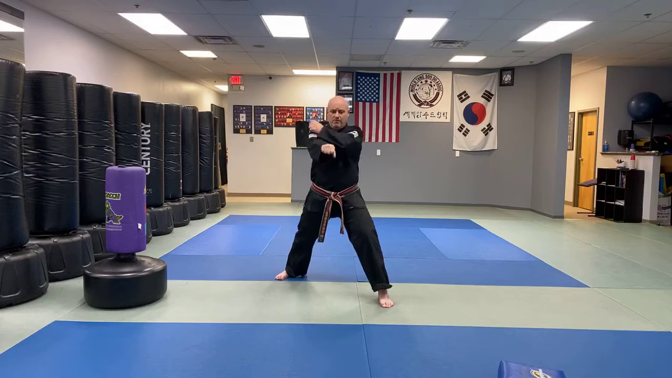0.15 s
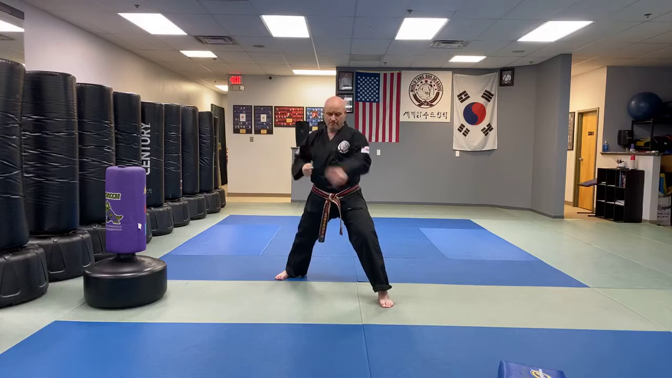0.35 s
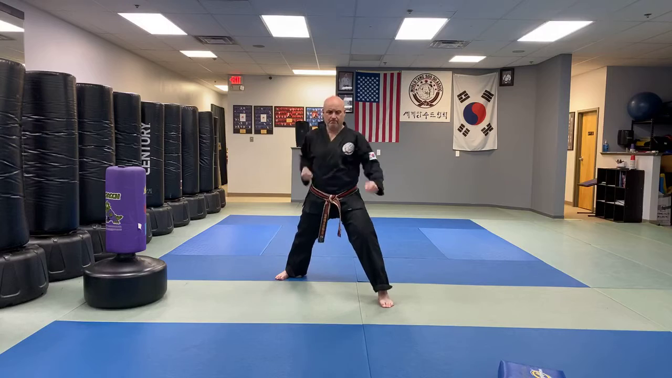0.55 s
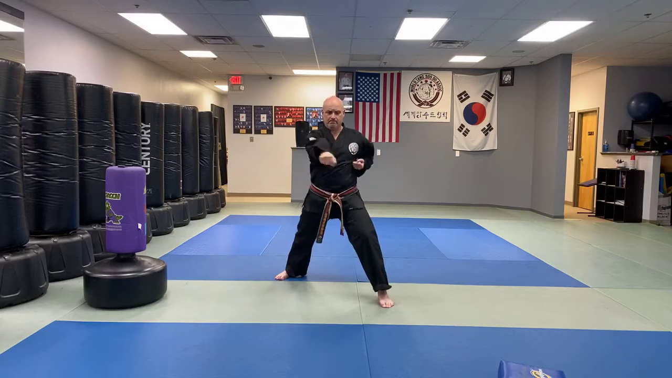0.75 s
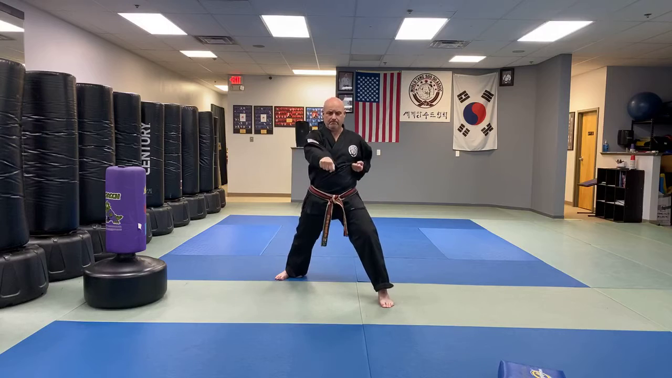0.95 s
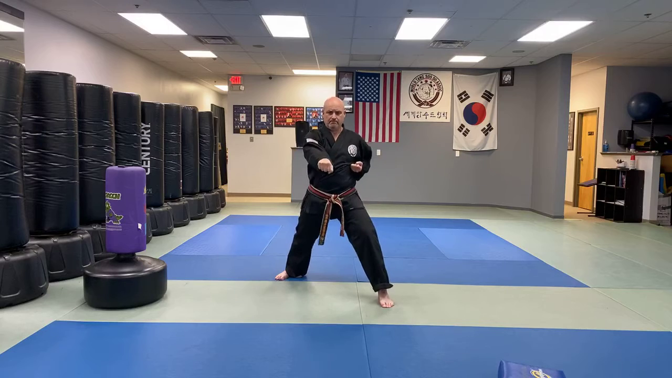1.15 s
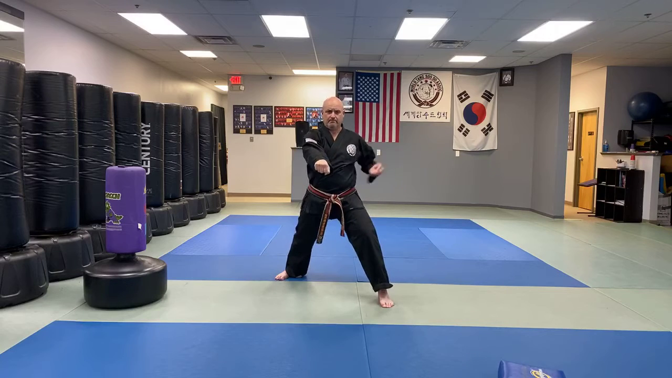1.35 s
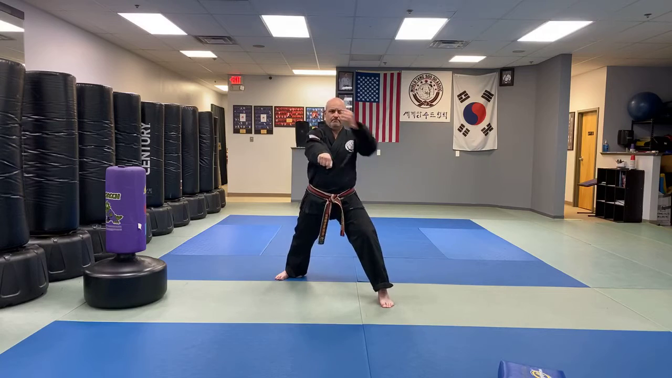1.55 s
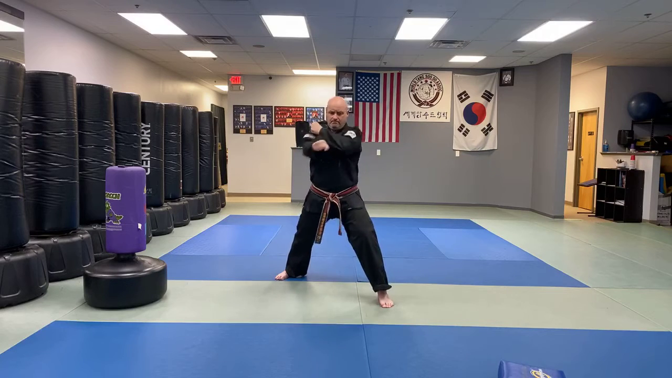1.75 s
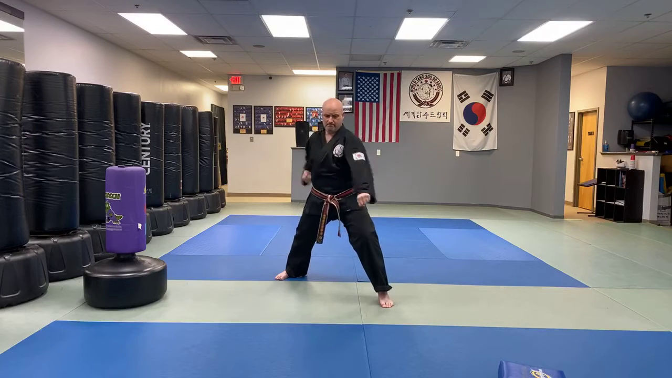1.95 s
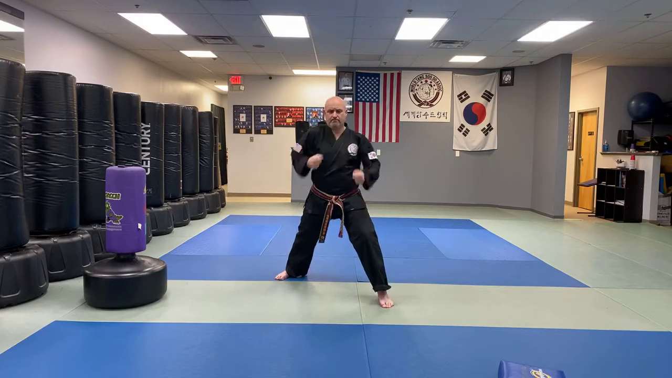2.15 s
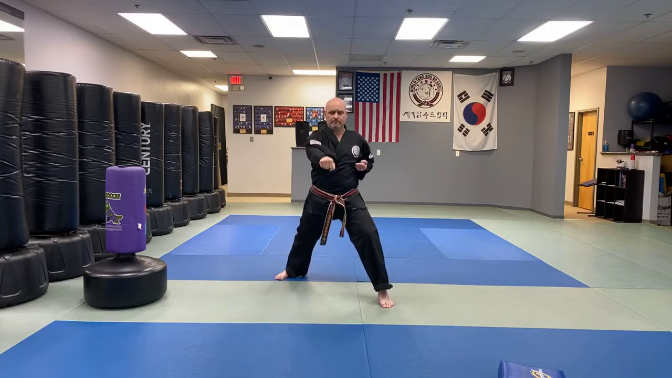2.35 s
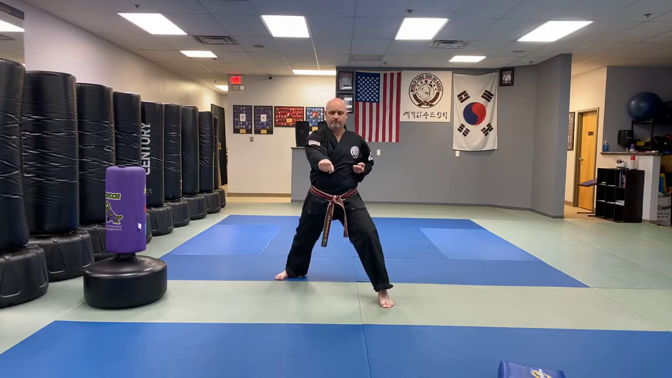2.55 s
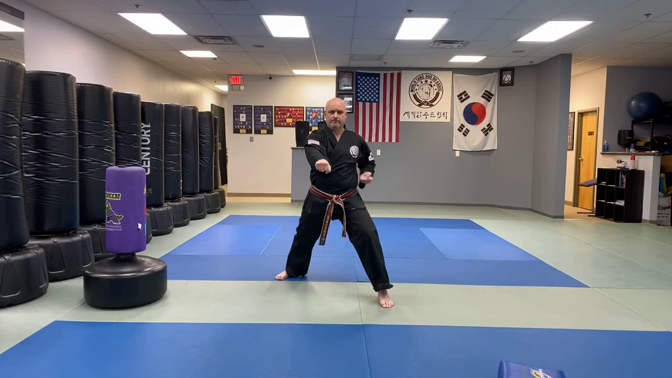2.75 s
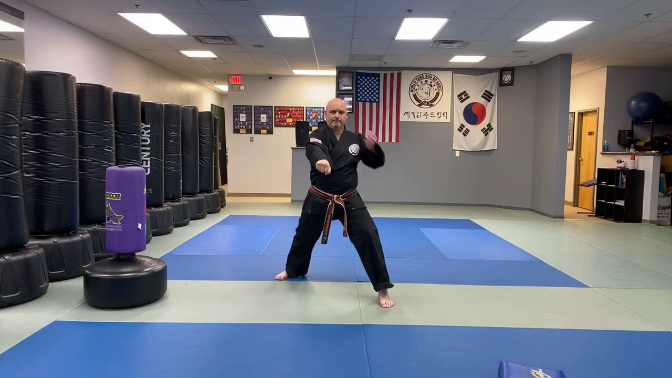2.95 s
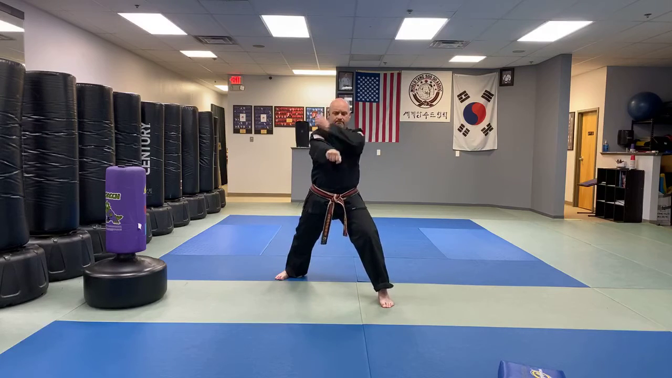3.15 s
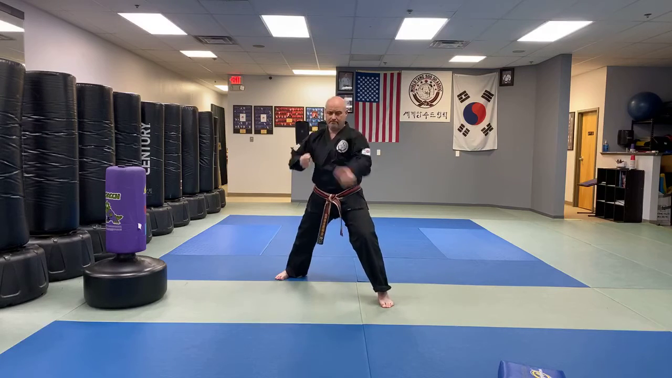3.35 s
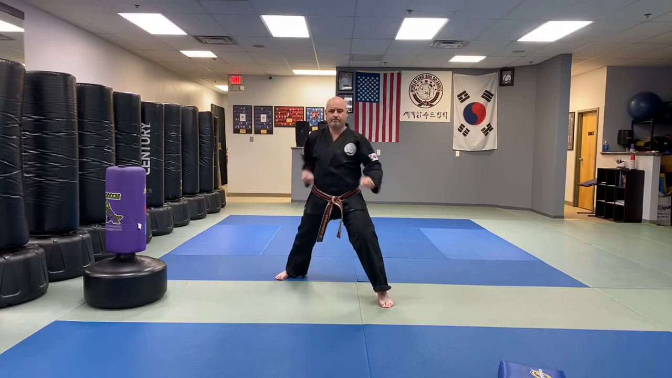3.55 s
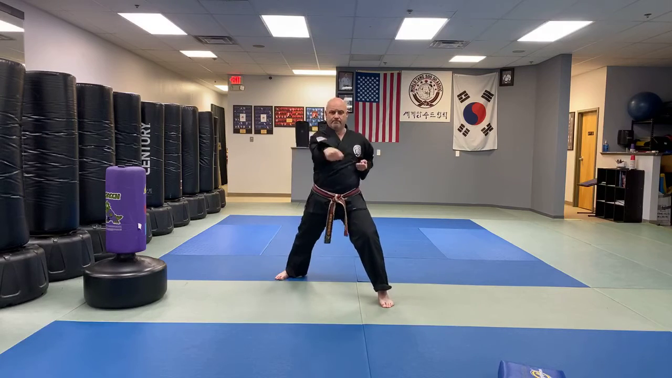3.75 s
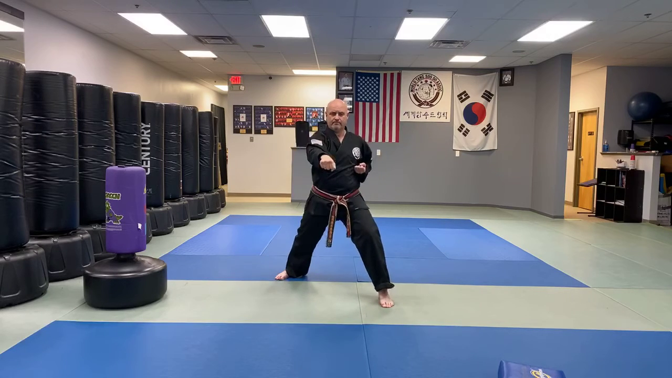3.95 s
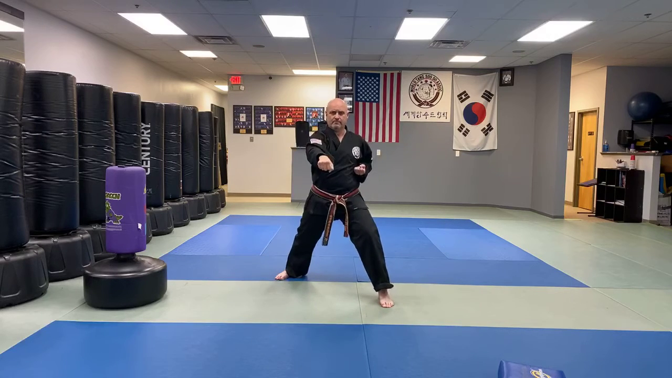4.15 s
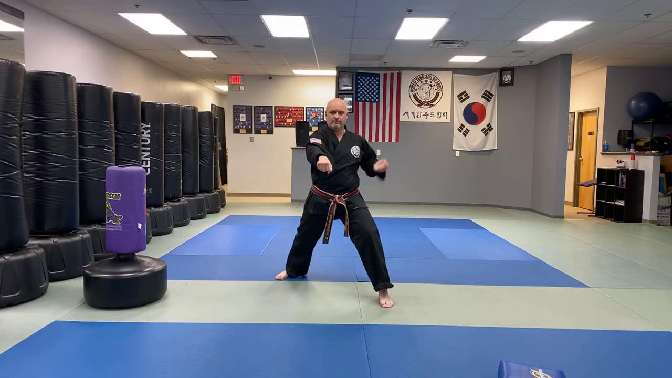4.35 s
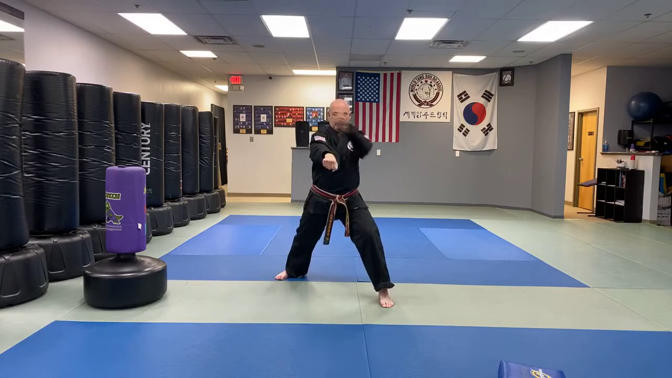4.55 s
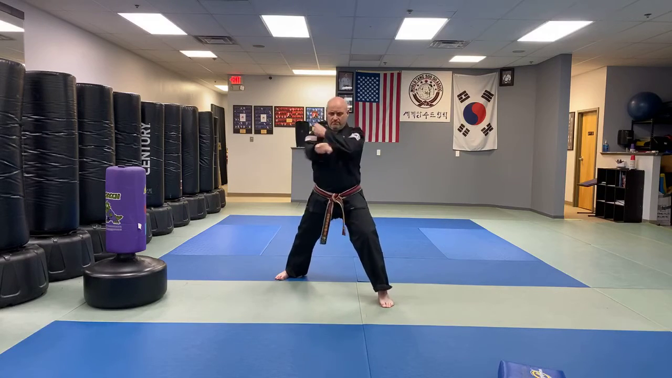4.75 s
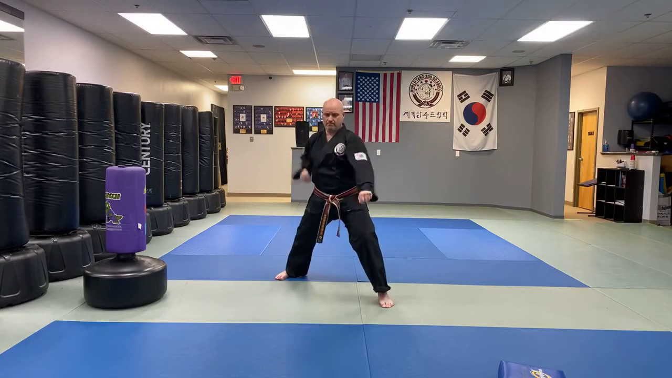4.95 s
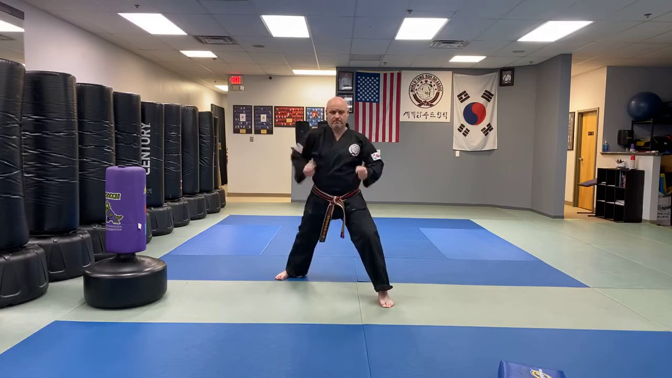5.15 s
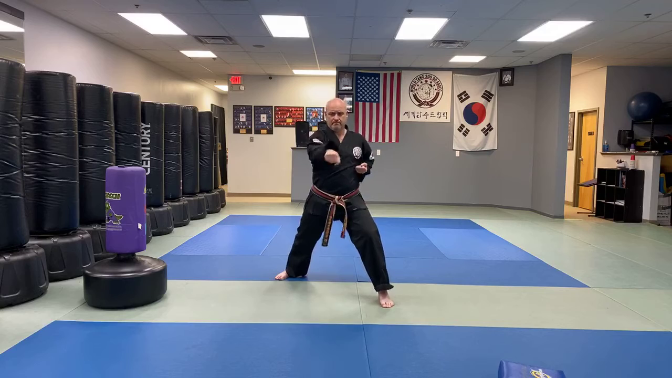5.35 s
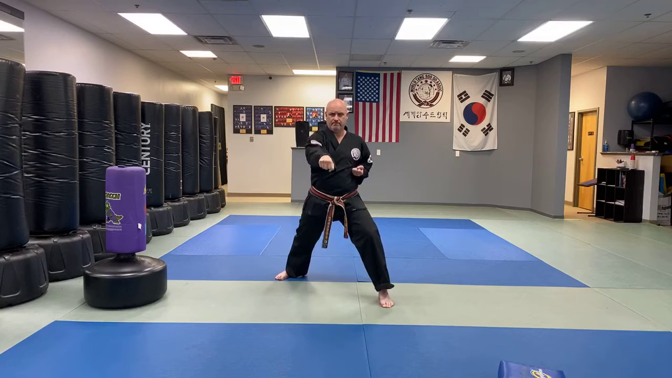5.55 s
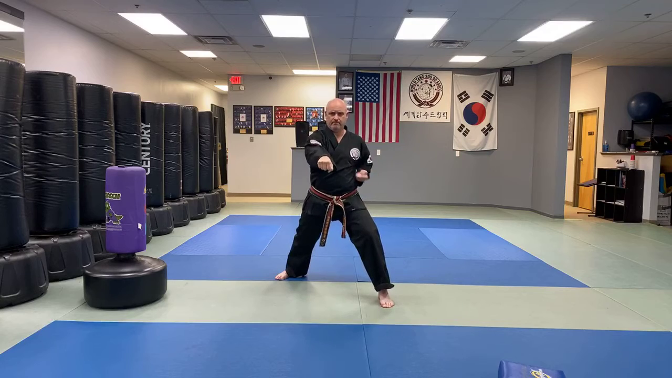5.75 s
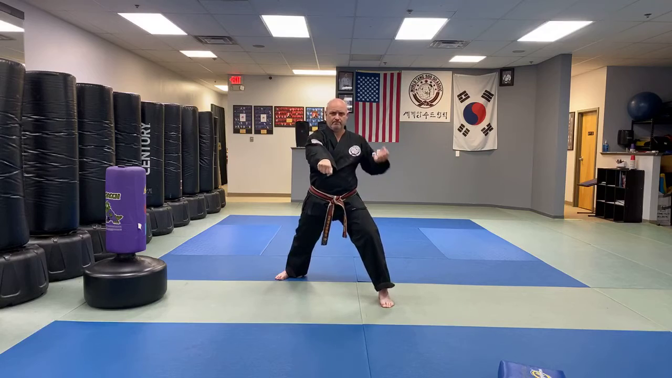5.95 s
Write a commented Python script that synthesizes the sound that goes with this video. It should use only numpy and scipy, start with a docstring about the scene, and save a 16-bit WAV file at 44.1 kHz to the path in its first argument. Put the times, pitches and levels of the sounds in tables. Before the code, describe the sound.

Heavy cotton sleeves swish and snap taut in four block-and-punch rounds, with low cloth thumps, quiet gaps and a fifth swing starting.

```python
"""Heavy cotton sleeves in a block-and-punch drill

In each of four rounds the arms wind up, then strike and settle; a fifth wind-up begins.
Fibre slips, as shaped noise, drag and swish while the loose jacket flops in the bass. Short damped swings of air
thump as cloth snaps taut and pop, followed by a fizz, as creases open. Two folds flutter as gliding tones,
and a faint steady noise hisses beneath."""
import sys
import numpy as np
from scipy import signal
from scipy.fft import rfft, irfft
from scipy.io import wavfile
from scipy.ndimage import uniform_filter1d

SR = 44100
rng = np.random.default_rng(int(sys.argv[2]) if len(sys.argv) > 2 else 0)


def int16_out(signal):
    """Quantize to a 16-bit WAV file."""
    q = np.round(np.clip(np.atleast_2d(signal).T, -1, 1) * 32767)
    wavfile.write(sys.argv[1], SR, q.astype(np.int16))


N = 268921
T = np.arange(N) / SR  # time [s]


def undb(db):
    """Decibel law: 20 dB is a factor of ten in amplitude."""
    return 10 ** (np.asarray(db) / 20)


def colour(x, points):
    """Minimum-phase filtering: a folded cepstrum makes the gain outline causal; white noise keeps its rms."""
    hz, db = np.transpose(points)
    size = 8192
    log_hz = np.log(np.fft.rfftfreq(size, 1 / SR) + 1)  # 1 Hz added to avoid log(0)
    log_gain = np.log(undb(np.interp(log_hz, np.log(hz), db)))
    cepstrum = irfft(log_gain)
    cepstrum[1:size // 2] *= 2
    cepstrum[size // 2 + 1:] = 0
    response = irfft(np.exp(rfft(cepstrum)))[:size // 2]
    unit_response = response / np.sqrt(np.sum(response ** 2))
    return signal.fftconvolve(x, unit_response)[:N]


def grains(per_s, spread_db):
    """Stick-slip friction as shot noise: random slips of uneven but bounded size, with rms 1."""
    size_db = spread_db * np.minimum(rng.exponential(size=N), 3)
    happens = rng.random(N) < per_s / SR
    slips = happens * rng.standard_normal(N) * undb(size_db)
    return slips / np.sqrt(np.mean(slips ** 2))


def flicker(per_s, depth_db):
    """Random amplitude modulation: the gain wanders as contact between the layers comes and goes."""
    k = int(SR / per_s)
    steps = np.repeat(rng.standard_normal(N // k + 1), k)[:N]
    wander = 1.22 * uniform_filter1d(steps, k)  # 1.22 restores the rms lost in smoothing
    return undb(depth_db * wander)


def hump(t, rise, fall, edge=2):
    """Asymmetric bell envelope with 1/e rise and fall times; a higher edge flattens the top."""
    return np.exp(-np.abs(t / np.where(t < 0, rise, fall)) ** edge)


def swings(table, rise_cycles, fall_cycles):
    """Heavily damped oscillation: air under the cloth swings once or twice and stops."""
    out = np.zeros(N)
    for peak_s, db, hz, *_ in table:
        near = slice(max(int((peak_s - .03) * SR), 0), int((peak_s + .04) * SR))
        cycles = (T[near] - peak_s) * hz
        envelope = undb(db) * hump(cycles, rise_cycles, fall_cycles)
        out[near] += envelope * np.cos(2 * np.pi * cycles)
    return out


# Spectrum of the faint background noise: (frequency [Hz], relative level [dB])
HISS_SPECTRUM = [(15, -26), (25, 0), (122, -1.5), (260, -13), (359, -13.5), (648, -19.5), (1620, -29.5),
                 (2490, -37.5), (15500, -40.5)]


def hiss(level_db=-66.5):
    """Stationary noise: white noise takes the colour of its filter, strongest in the bass."""
    return undb(level_db) * colour(rng.standard_normal(N), HISS_SPECTRUM)


# Fluttering folds, pitch before wobble and level before envelope and flicker:
# (start [s], length [ms], level [dB], start pitch [Hz], end pitch [Hz])
FOLD_FLUTTERS = [(3.036, 50, -28, 950, 240), (5.108, 45, -39, 170, 400)]


def flutters():
    """Frequency modulation: a fold's tone glides and wobbles in pitch, roughened by a fast flicker."""
    out = np.zeros(N)
    wobble = flicker(200, 1.0)  # a pitch ratio here
    for start_s, ms, db, from_hz, to_hz in FOLD_FLUTTERS:
        done = np.clip((T - start_s) * 1000 / ms, 0, 1)  # fraction of the flutter elapsed
        hz = from_hz * (to_hz / from_hz) ** (done ** .75) * wobble
        envelope = np.sqrt(np.abs(np.sin(np.pi * done ** 1.4))) * (done < 1)
        out += undb(db) * envelope * np.sin(2 * np.pi * np.cumsum(hz) / SR)
    return out * flicker(250, 4.0)


# Creases popping open: (time [s], peak level [dB], pitch [Hz], initial fizz in the treble [dB])
CREASE_POPS = [(0.2143, -23, 1800, -58), (.405, -28.5, 1090, -66), (0.436, -21, 436, -57),
               (0.4941, -12, 274, -45), (0.6943, -33, 1510, -59), (0.715, -26.5, 605, -65),
               (1.909, -35, 900, -65), (1.94, -25.5, 1320, -63), (1.9578, -28.5, 1020, -69),
               (1.998, -42, 700, -68), (2.024, -25.5, 365, -45), (2.2442, -24, 600, -61),
               (3.031, -19.5, 695, -58), (3.224, -28.5, 453, -51), (3.357, -29.5, 675, -68),
               (3.426, -34.5, 700, -76), (3.4823, -20.5, 490, -46), (3.7342, -25, 800, -47),
               (4.4435, -35.5, 587, -77), (4.5359, -15, 454, -51), (5.006, -30.5, 786, -57.5),
               (5.0114, -26.5, 826, -74), (5.244, -21, 476, -58), (5.2736, -32.5, 1500, -41.5),
               (5.971, -30.5, 464, -79)]


def pops():
    """Rarefaction: an opening crease sucks air in, so its damped swing has a negative peak."""
    return -swings(CREASE_POPS, rise_cycles=.24, fall_cycles=.5)


def fizz(decay_ms=9.0):
    """Exponential decay: after each pop the fibres fizz as briefly ringing-down noise."""
    envelope = np.zeros(N)
    for pop_s, _, _, db in CREASE_POPS:
        decay = np.exp(-np.maximum(T - pop_s, 0) * 1000 / decay_ms)
        envelope += (T >= pop_s) * undb(db) * decay
    treble_fizz = colour(rng.standard_normal(N) * envelope, TREBLE_SPECTRUM)
    rub_fizz = colour(rng.standard_normal(N) * envelope, RUB_SPECTRUM)
    return treble_fizz + undb(1.0) * rub_fizz


# Rounds of the drill, levels and slopes before the layer gains; the fifth has no changeover before
# the punch settles, so only its wind-up is heard:
# (arms cross [s], wind-up drag [dB], wind-up flopping [dB], drag growth [dB/s], drag sag [dB/s],
#  wind-up drag gives way to strike drag [s], punch settles [s], strike drag [dB], strike flopping [dB],
#  drag settling [dB/s])
DRILL_ROUNDS = [(0.08, -41, -34, 28, 52, 0.59, 0.71, -52.5, -37, 84),
                (1.64, -49, -36, 58.5, 33.5, 1.99, 2.278, -48.5, -35.5, 111),
                (3.072, -47, -35, 75.5, 42, 3.67, 3.795, -50.5, -36.5, 141),
                (4.62, -52, -38.5, 48, 34, 5.0, 5.275, -52.5, -38.5, 78),
                (6.12, -54.5, -45, 49, 40, 8.5, 6.75, -50, -36, 105)]
STRIKE_RISE_DB_S = 45  # drag slope from the changeover until the punch settles
FLOP_GROWS, FLOP_SAGS, FLOP_SETTLES = 1.6, 0.78, 1.87  # dB of flopping for each dB of drag
SHAKE_DB, SHAKE_FALL_DB_S = -37.5, 280.5  # flopping after the changeover: start level, fall per second


def drag():
    """Power addition: slow rub and flopping follow a wind-up, which gives way abruptly to a strike."""
    rub_power, flop_power = np.zeros(N), np.zeros(N)
    for (cross_s, wind_db, wind_flop_db, grow, sag,
         change_s, settle_s, strike_db, strike_flop_db, rest) in DRILL_ROUNDS:
        wind_up = (T < change_s, cross_s, wind_db, wind_flop_db, grow, sag, FLOP_SAGS)
        strike = (T >= change_s, settle_s, strike_db, strike_flop_db, STRIKE_RISE_DB_S, rest, FLOP_SETTLES)
        for on, peak_s, db, flop_db, rise, fall, follow in (wind_up, strike):
            before_db = rise * np.minimum(T - peak_s, 0)
            after_db = fall * np.maximum(T - peak_s, 0)
            rub_power += on * undb(db + before_db - after_db) ** 2
            flop_power += on * undb(flop_db + FLOP_GROWS * before_db - follow * after_db) ** 2
        shake_db = SHAKE_DB - SHAKE_FALL_DB_S * np.abs(T - change_s)
        flop_power += (T >= change_s) * undb(shake_db) ** 2
    return rub_power, flop_power


def small_thumps(count=40, over_flop_db=6.5, spread_db=3.5, low_hz=84.5, high_hz=260):
    """Random point process: chance thumps whose level follows the slow flopping at their moment."""
    when, pitch, size = rng.random((count, 3)).T
    _, flop_power = drag()
    flop_db = 10 * np.log10(flop_power[(when * N).astype(int)])
    db = flop_db + over_flop_db + spread_db * (2 * size - 1)  # spread either way
    hz = low_hz * (high_hz / low_hz) ** pitch
    return np.transpose([when * N / SR, db, hz])


# Cloth snapping taut and pushing air out: (time [s], peak level [dB], pitch [Hz])
TAUT_THUMPS = [(0.0448, -27, 117), (0.118, -31, 160), (0.217, -25.5, 330), (0.288, -26.5, 302),
               (0.3623, -32, 99), (0.4375, -29, 114), (0.4964, -16, 120), (0.7347, -19.5, 113),
               (0.7467, -24, 103), (1.4386, -30, 80), (1.571, -17, 121), (1.6468, -28.5, 98),
               (1.775, -24.5, 201), (1.8014, -23.5, 200), (2.0278, -18.5, 135), (2.1807, -8.5, 122),
               (2.2157, -24, 199), (2.2434, -18.5, 183), (2.261, -12.5, 118), (3.0949, -24, 170),
               (3.1219, -34, 108), (3.1602, -24, 136), (3.195, -27.5, 111), (3.3702, -26, 122),
               (3.4853, -21, 100), (3.6366, -14.5, 137), (3.6782, -22.5, 73.4), (3.7179, -20.5, 142),
               (3.7303, -27, 172), (3.7486, -22.5, 93), (3.8694, -40, 105), (3.938, -38.5, 99),
               (4.41, -38, 90), (4.5381, -19.5, 193.5), (4.5587, -21.5, 203), (4.588, -23, 101),
               (4.6625, -25, 105), (4.8662, -28, 170.6), (4.8828, -26.5, 148), (5.065, -22.5, 102),
               (5.2249, -28, 154), (5.2472, -23, 142), (5.2647, -30, 188), (5.2869, -22, 80.5),
               (5.2975, -28, 105), (5.8364, -46, 118)]


def thumps():
    """Compression: taut cloth pushes air out, so each slow damped swing has a positive peak."""
    return swings([*TAUT_THUMPS, *small_thumps()], rise_cycles=0.26, fall_cycles=0.63)


# Quick slides of a sleeve, levels before the layer gains:
# (peak time [s], level [dB], rise [ms], fall [ms], treble relative to rub [dB])
SLEEVE_SWISHES = [(.210, -44, 17, 86, -11), (0.536, -49, 26, 14, -3), (.590, -51.5, 29, 22, -6.5),
                  (0.642, -29, 25.3, 10.2, -3.5), (0.747, -46.5, 36, 19, -3), (0.804, -59.5, 20, 10, 0),
                  (0.94, -76, 44, 21, 0), (1.26, -68, 50, 69, -5.5), (1.374, -57.5, 48, 78, -7),
                  (1.501, -44.5, 6.3, 39, -8), (1.546, -36.5, 45, 20, -13), (1.650, -48.5, 62, 42, -10),
                  (1.794, -44, 61, 60, -6), (1.945, -52.5, 41, 7.9, -11), (2.045, -56.5, 10, 19, 1),
                  (2.115, -54, 21, 14, 3.5), (2.148, -35.5, 19.4, 10, 0.5), (2.175, -31.5, 25, 18.3, -1),
                  (2.273, -37.5, 15.5, 13.5, -4.5), (2.335, -53, 20, 16, -2.5), (2.395, -60.5, 30, 10, 3.5),
                  (2.62, -80, 50, 41, 0.5), (2.741, -73, 50, 40, -5), (2.885, -63, 57, 28, -12),
                  (3.035, -38, 40, 53, -12), (3.149, -45, 17, 7.8, -6), (3.290, -47.5, 64, 36, -4),
                  (3.39, -60.5, 26, 18, 1.5), (3.529, -48, 22, 17, -1), (3.586, -42.5, 23, 28, -1),
                  (3.633, -30, 31.3, 25.5, 2), (3.741, -34.5, 15, 19, -6), (3.800, -71, 6.6, 7.4, 4),
                  (3.860, -65.5, 31, 15, 3.5), (3.945, -58.5, 19, 20.6, -7.5), (4.2, -75.5, 38, 37, 0.5),
                  (4.36, -64.5, 21, 65, -6), (4.537, -38.5, 55, 22, -9.5), (4.545, -47, 6.7, 83, -19),
                  (4.624, -47.5, 53, 32, -7.5), (4.810, -45.5, 64, 35, -6), (4.94, -61, 23, 19, -2.5),
                  (5.009, -51.5, 3.1, 9.7, -8), (5.054, -59, 31, 17, 5), (5.149, -41.5, 19, 8, 0.5),
                  (5.207, -32.5, 49.3, 18.4, -0.5), (5.281, -41.5, 10, 33, -5.5), (5.317, -41, 20, 9.2, -8),
                  (5.365, -59.5, 15, 27, -1), (5.420, -62, 27, 26, 3.5), (5.560, -67.5, 48, 48.1, -6.5),
                  (5.75, -75, 53, 50, 4.5), (5.891, -68, 20, 71, -2), (6.062, -39.5, 36, 150, -9)]
DRAG_TREBLE_DB = -7  # treble relative to the slow drag, before the layer gains
RISE_EDGE, FALL_EDGE = 1.9, 2.6  # a swish swells gently, stops sharply
SWISH_FLOP_DB, SWISH_FLOP_SLOPE = 0.5, -0.4  # at a -45 dB swish; louder, fast ones pull the jacket tight
DULL_FLOP = .2  # dB more flopping for each dB less treble


def sleeve_motion():
    """Incoherent superposition: drag and swishes add their power; returns rub, treble and flop amplitudes."""
    rub_power, flop_power = drag()
    treble_power = rub_power * undb(DRAG_TREBLE_DB) ** 2
    for peak_s, db, rise_ms, fall_ms, bright_db in SLEEVE_SWISHES:
        edge = np.where(T < peak_s, RISE_EDGE, FALL_EDGE)
        power = (undb(db) * hump(T - peak_s, rise_ms / 1000, fall_ms / 1000, edge)) ** 2
        over_swish_db = SWISH_FLOP_DB + SWISH_FLOP_SLOPE * (db + 45) - DULL_FLOP * bright_db
        rub_power = rub_power + power
        treble_power = treble_power + power * undb(bright_db) ** 2
        flop_power = flop_power + power * undb(over_swish_db) ** 2
    return np.sqrt(rub_power), np.sqrt(treble_power), np.sqrt(flop_power)


# Spectra of the cloth layers, each (frequency [Hz], relative level [dB])
# Fibres slipping through the weave, in the middle range
RUB_SPECTRUM = [(100, -50), (350, -11), (600, 5), (1100, 3.5), (2000, 1), (3200, -1), (4500, -10.5),
                (7000, -26), (14000, -63.5)]
# The bright part of the fibre slips
TREBLE_SPECTRUM = [(900, -49), (2500, -13.5), (3800, 7), (5700, 7), (7500, 1), (9500, -5.5), (12000, -9.5),
                   (16000, -59.5)]
# The very top of the fibre slips
SHEEN_SPECTRUM = [(3000, -45), (6500, -17.5), (9000, -4), (11000, -10.5), (13500, -12.5), (16000, -19)]
# Small folds, in the low middle range
BODY_SPECTRUM = [(60, -43), (150, -20.5), (280, 5.5), (450, 5.5), (750, -5.5), (1300, -13), (4000, -66.5)]
# Big folds of the loose jacket, in the bass
FLOP_SPECTRUM = [(20, -43.5), (40, -5.5), (70, 3), (125, 0.5), (250, -3.5), (500, -13.5), (900, -17),
                 (1600, -40), (6000, -79)]


def cloth():
    """Source-filter principle: friction slips follow the motion and sound through five spectral outlines."""
    rub, treble, flop = sleeve_motion()
    body = undb(-4.0) * np.sqrt(rub * flop)  # small folds need both sliding and slack
    sheen = undb(-11.5) * treble ** 1.027  # faster slides are brighter at the very top
    contact = flicker(60, 1.28)  # shared by all fibre slips
    rub_slips = grains(per_s=12000, spread_db=1.5) * contact * rub
    treble_slips = grains(per_s=16000, spread_db=0.2) * contact * flicker(40, 1.34) * treble
    sheen_slips = grains(per_s=16000, spread_db=3.0) * contact * flicker(69, 0.45) * sheen
    body_slips = grains(per_s=2500, spread_db=-0.7) * flicker(50, 2.8) * body
    flop_slips = grains(per_s=1200, spread_db=1.0) * flicker(30, 2.2) * flop
    return (undb(2.0) * colour(rub_slips, RUB_SPECTRUM)
            + colour(treble_slips, TREBLE_SPECTRUM)
            + colour(sheen_slips, SHEEN_SPECTRUM)
            + colour(body_slips, BODY_SPECTRUM)
            + colour(flop_slips, FLOP_SPECTRUM))


def scene():
    """Linear superposition: the pressures of all sources add in one channel."""
    mix = hiss() + flutters() + pops() + fizz() + thumps() + cloth()
    return mix[None, :]


def record(dry, top_hz=15780):
    """Band limiting: a steep elliptic low-pass cuts off the top."""
    low_pass = signal.ellip(14, .3, 100, top_hz, fs=SR, output="sos")  # order, ripple dB, stopband dB
    return signal.sosfilt(low_pass, dry)


dry = scene()
out = record(dry)
int16_out(out)
```